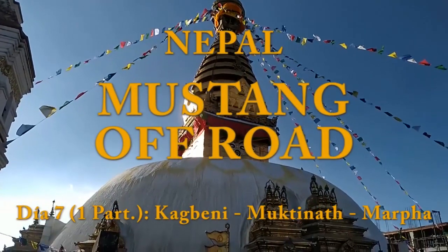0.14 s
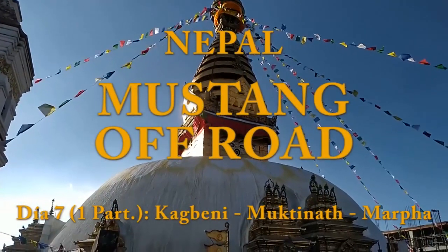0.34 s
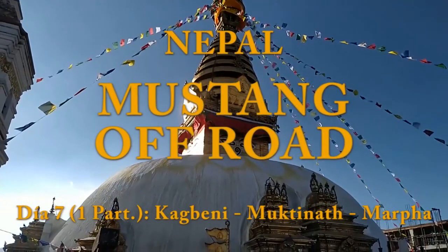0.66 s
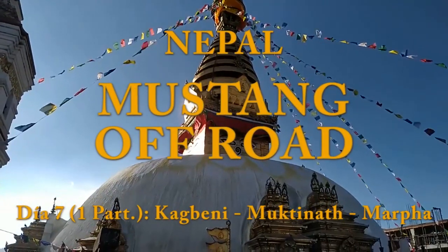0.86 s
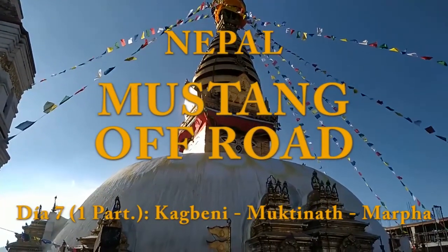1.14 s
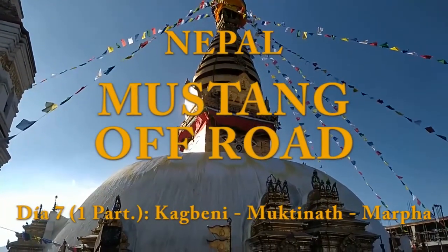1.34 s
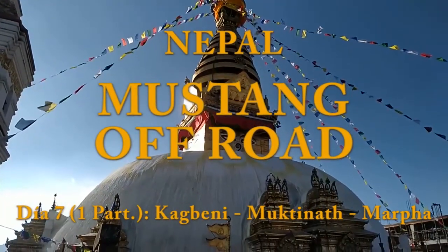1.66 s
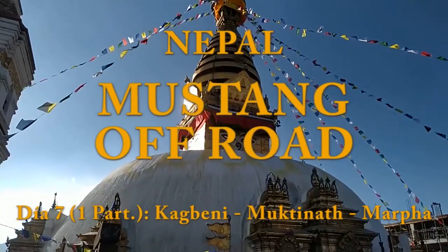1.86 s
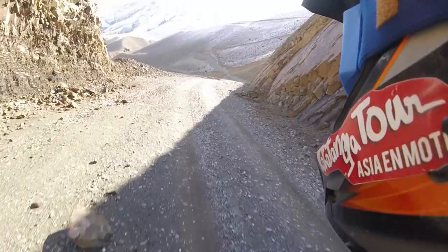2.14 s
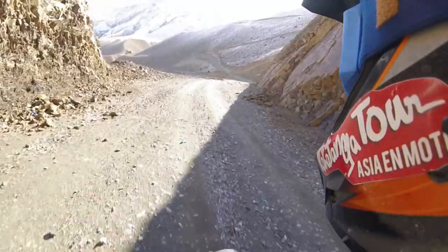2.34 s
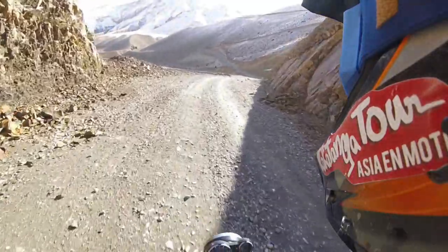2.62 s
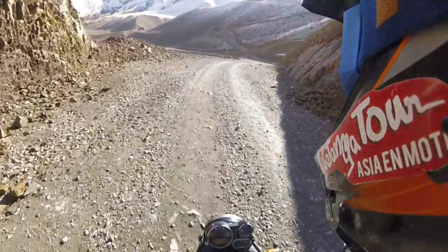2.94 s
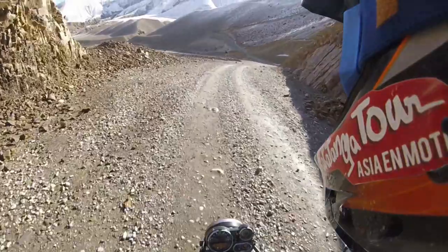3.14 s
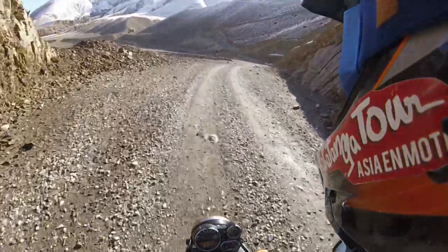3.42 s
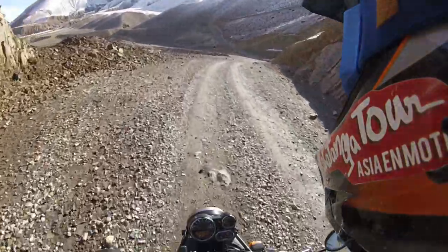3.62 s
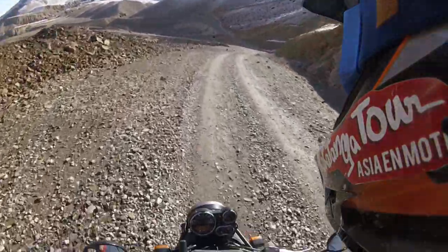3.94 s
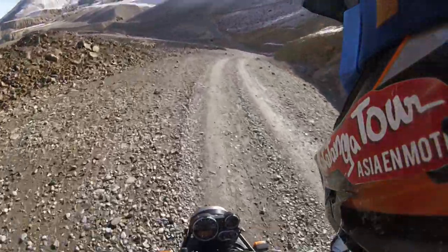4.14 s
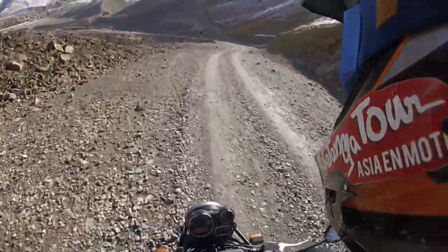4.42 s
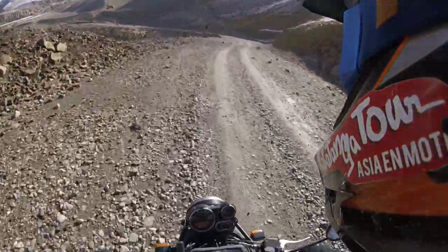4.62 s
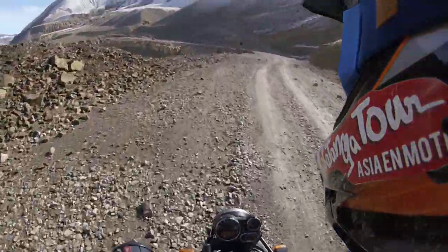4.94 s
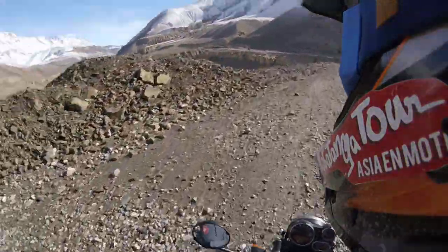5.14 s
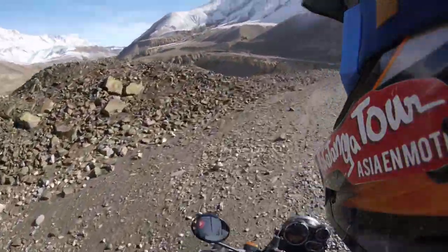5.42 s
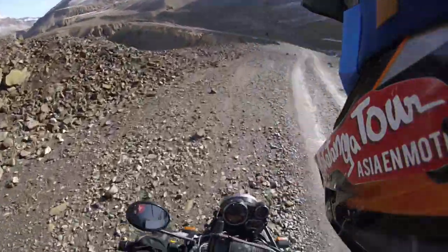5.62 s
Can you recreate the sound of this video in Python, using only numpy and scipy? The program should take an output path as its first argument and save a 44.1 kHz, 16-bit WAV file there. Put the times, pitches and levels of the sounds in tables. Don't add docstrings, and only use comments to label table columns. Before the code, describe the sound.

Wind presses on a small camera microphone inside a plastic housing, outdoors on a moving single-cylinder motorcycle. From the start, irregular low thumps and rumbling overlie a steady engine: about thirty soft exhaust thuds a second, a hollow casing knock and faint pipe ring. Valve gear ticks and hisses, coloured by the housing into a thin, high whistle, with a faint crunch of gravel. The engine rises slightly until about 2.1 s while wind thickens, and from 1 to 3.4 s strong pushes and short tearing snaps crowd together. A thin stone chip clicks near 2.7 s. The engine then slows, reaching its lowest pace around 4.8 s. Wind eases from 3.5 s, uncovering the exhaust thuds, and loose parts rattle sharply around 4.7 to 4.9 s. From about 5 s the engine speeds up again and bursts of wind return, brighter and rougher, with dense snaps until the abrupt end.

```python
import sys
import numpy as np
from scipy import signal
from scipy.fft import rfft, irfft
from scipy.io import wavfile
from scipy.ndimage import uniform_filter1d

SR = 44100
rng = np.random.default_rng(int(sys.argv[2]) if len(sys.argv) > 2 else 0)


def master_out(mix):
    frames = np.transpose(np.atleast_2d(mix))
    ceiling = np.clip(frames, -1, 1)
    pcm = np.round(ceiling * 32767).astype(np.int16)
    wavfile.write(sys.argv[1], SR, pcm)


def invert_db(x):
    u = np.asarray(x, float) / 20
    return 10 ** u


N = 254192
T = np.arange(N) / SR
HZ = np.fft.rfftfreq(N, 1 / SR)


def evened(x):
    return x / np.sqrt(np.mean(x ** 2) + 1e-20)


def curve(rows, column):
    columns = np.transpose(rows)
    return np.interp(T, columns[0], columns[column])


def colour(x, points):
    hz, db = np.transpose(points)
    gain_db = np.interp(np.log(HZ + 1), np.log(hz + 1), db, -120, -120)
    return irfft(rfft(x) * invert_db(gain_db), N)


def band(x, lo_hz, hi_hz):
    return signal.sosfiltfilt(signal.butter(2, [lo_hz, hi_hz], "band", fs=SR, output="sos"), x)


def split(x):
    below_70, below_320 = (1 / (1 + (HZ / hz) ** 4) for hz in (70, 320))
    gains = (below_70, below_320 - below_70, 1 - below_320)
    return [irfft(rfft(x) * gain, N) for gain in gains]


def resonate(x, modes):
    out = np.zeros(N)
    for k, (hz, width_hz, db) in enumerate(modes):
        r = np.exp(-np.pi * width_hz / SR)
        angle = 2 * np.pi * hz / SR
        rung = signal.lfilter([1, 0, -1], [1, -2 * r * np.cos(angle), r * r], x)
        out += (-1) ** k * invert_db(db) * (1 - r) * rung
    return out


def drift(seconds):
    size = max(int(seconds * SR), 2)
    return evened(uniform_filter1d(uniform_filter1d(rng.standard_normal(N), size), size))


def ticks(per_s, size_db, fade_s):
    sizes = invert_db(size_db * np.minimum(rng.exponential(1, N), 4))
    hits = sizes * (rng.random(N) < per_s / SR)
    return evened(signal.lfilter([1], [1, -np.exp(-1 / (fade_s * SR))], hits))


def burst(rows, t60_s):
    swell = np.zeros(N)
    for start_s, db in rows:
        part = slice(round(start_s * SR), round((start_s + .1) * SR))
        after_s = np.maximum(T[part] - start_s - .0008, 0)
        swell[part] += invert_db(db - 60 * after_s / t60_s) * np.minimum(after_s / .0007, 1)
    return swell * rng.standard_normal(N)


# time_s, firing_rate_hz
ENGINE_SPEED = [(0.0, 30.01), (0.3, 30.64), (0.9, 31.09), (1.2, 31.71), (1.5, 32.44), (1.8, 33.42),
                (2.1, 33.68), (2.4, 33.54), (2.7, 31.73), (3.3, 29.98), (3.6, 28.24), (3.9, 26.11),
                (4.2, 24.34), (4.5, 22.88), (4.8, 20.88), (5.1, 22.33), (5.4, 23.95), (5.76, 25.27)]


def firing_hz():
    return curve(ENGINE_SPEED, 1)


def once_a_cycle(place, width):
    turns = np.cumsum(firing_hz()) / SR
    return np.exp((np.cos(2 * np.pi * (turns - place)) - 1) / (2 * np.pi * width) ** 2)


# middle_s, rise_db, length_s
GUST_BUMPS = [(0.07, 6, 0.091), (0.675, 3.5, 0.025), (0.943, 1.5, 0.032), (1.4, 3, 0.015),
              (1.626, -1, 0.035), (1.927, 3.5, 0.046), (2.156, 6, 0.035), (2.54, 3, 0.047),
              (2.676, 5.5, 0.02), (3.09, 2.5, 0.053), (3.267, -1.5, 0.021), (3.315, -17, 0.01),
              (3.36, -1.5, 0.011), (3.6, -5, 0.054), (4.937, 10.5, 0.013), (5.07, 5, 0.017),
              (5.206, 8.5, 0.039), (5.352, 9, 0.04), (5.449, 12.5, 0.016), (5.514, 13, 0.023),
              (5.694, 11, 0.017)]


def gusts():
    return sum(db * np.exp(-.5 * ((T - s) / length_s) ** 2) for s, db, length_s in GUST_BUMPS)


# time_s, level_db
ENGINE_NOISE = [(0.0, -50.5), (0.11, -48.5), (0.64, -44.5), (2.07, -44), (2.44, -41.5), (2.62, -44.5),
                (3.03, -43), (3.27, -47), (3.87, -46.5), (4.11, -47.5), (4.72, -46.5), (5.21, -51),
                (5.32, -53.5), (5.58, -51), (5.76, -52.5)]


def engine_noise_db():
    return curve(ENGINE_NOISE, 1)


# pitch_hz, level_db (per Hz)
HOUSING_TONE = [(3300, -36), (4500, -25), (5000, -18.5), (5950, -14), (6250, -7), (6500, 2.5), (6950, -4),
                (7250, -5.5), (7900, -12), (9500, -16), (10500, -26), (11200, -29.5), (13000, -33.5),
                (14200, -66)]


def through_housing(x):
    return colour(x, HOUSING_TONE)


# pitch_hz, level_db (per Hz)
GRAVEL_TONE = [(900, -4), (1500, 2), (2200, -5), (3400, -8.5), (4000, -14), (4500, -20), (6000, -60)]


def on_gravel(x):
    return colour(x, GRAVEL_TONE)


def tyres():
    bed = 1.5 + 0.27 * ticks(per_s=170, size_db=7.0, fade_s=0.0048)
    open_db = engine_noise_db()
    level_db = -50.5 + 0.25 * (firing_hz() - 30)
    level_db += 0.79 * (open_db - open_db.mean())
    level_db += 0.2 * gusts()
    return invert_db(level_db) * evened(on_gravel(bed * rng.standard_normal(N)))


# start_s, peak_db
LOOSE_PARTS = [(1.5, -30), (1.715, -31), (1.7454, -32), (2.2164, -31), (2.4275, -29), (2.836, -25),
               (2.9612, -26), (3.1918, -26), (3.557, -35.5), (3.739, -27), (4.079, -34), (4.472, -29),
               (4.963, -42), (5.62, -36), (5.7235, -28), (2.9855, -28), (3.091, -37), (3.225, -27),
               (3.39, -39), (3.481, -34), (3.5106, -25), (4.2907, -25), (4.3765, -27.5), (4.444, -26),
               (4.72, -20), (4.739, -20), (4.784, -40), (4.8069, -20.5), (4.8322, -23), (4.8793, -28),
               (4.915, -26), (5.03, -28), (5.062, -30.5), (5.1326, -28), (5.229, -23), (5.3095, -23.5),
               (5.3462, -31), (5.678, -30)]
# start_s, peak_db
VALVE_TAPS = [(0.6784, -49), (0.7382, -45), (0.8679, -45), (1.1263, -45), (1.2206, -43), (1.4361, -44),
              (1.4696, -44), (1.6482, -45), (1.8652, -39), (2.3082, -50), (2.4862, -42), (2.607, -34),
              (2.7716, -39), (2.837, -39), (2.8679, -39), (2.8948, -42), (2.9577, -37), (2.9901, -39),
              (3.0919, -38), (3.1537, -40), (3.1877, -43), (3.2241, -41), (3.3578, -44), (3.3887, -39),
              (3.4905, -44), (3.5952, -52), (3.707, -45), (4.0911, -47), (4.1694, -46), (4.2946, -37),
              (4.375, -41), (4.4214, -44), (4.4443, -52), (4.4717, -47), (4.7222, -44), (4.782, -45),
              (4.8065, -51), (4.8334, -39), (4.8803, -50), (4.9217, -47), (5.0634, -43), (5.1053, -50),
              (5.2325, -51), (5.3133, -56), (5.6176, -51), (5.7234, -50)]
CHIP_S, CHIP_DB = 2.663, -42.5


def rattles():
    scale = np.std(through_housing(rng.standard_normal(N)))
    bursts = invert_db(-10.5) * burst(LOOSE_PARTS, t60_s=0.037)
    knocks = through_housing(bursts) + invert_db(-16.0) * on_gravel(bursts)
    loose = band(knocks, 300, 10000) / scale
    taps = invert_db(2) * band(burst(VALVE_TAPS, t60_s=0.057), 8200, 10240)
    chip = invert_db(13) * band(burst([(CHIP_S, CHIP_DB)], t60_s=0.015), 2600, 5200)
    return loose + taps + chip


def clatter():
    gate = .75 + .22 * once_a_cycle(place=.58, width=.13) + .3 * once_a_cycle(place=.75, width=.05)
    bed = gate * (5 + 0.075 * ticks(per_s=110, size_db=0.0, fade_s=0.00058))
    jolts_db = 0.54 * drift(0.051)
    level_db = engine_noise_db() + 1 + jolts_db
    return invert_db(level_db) * evened(through_housing(bed * rng.standard_normal(N)))


# time_s, exhaust_thud_db, casing_knock_db
ENGINE_EFFORT = [(0, -52, -49), (.6, -40, -44.5), (1.2, -26.5, -43), (1.8, -32, -42), (2.4, -44, -39),
                 (3, -54, -49), (3.6, -25.5, -44.5), (4.2, -26, -44), (4.6, -28.5, -46.5), (4.9, -32, -46),
                 (5.3, -43, -53), (5.76, -21, -38)]
# pitch_hz, width_hz, level_db
CASING_MODES = [(697, 130, 2), (777, 116, 5.5), (959, 13.6, 5.5), (1035, 50, 1), (1615, 290, -20.5)]


def casing():
    load = np.interp(firing_hz(), (25, 30), (.15, 1))
    gate = .55 + load * once_a_cycle(place=.9, width=.07) + .3 * once_a_cycle(place=.42, width=.07)
    knock = 30 * 0.27 * load * once_a_cycle(place=.9 + 0.0057 * drift(0.059), width=0.00082)
    rung = resonate(gate * rng.standard_normal(N) + knock, CASING_MODES)
    return invert_db(curve(ENGINE_EFFORT, 2)) * evened(rung)


# pitch_hz, width_hz, level_db
PIPE_MODES = [(76.6, 51, 0.014), (101.3, 67, -2)]
# pitch_hz, width_hz, level_db
SILENCER_MODES = [(289.6, 24.3, 0)]
# time_s, level_db
SILENCER_RING = [
    (0, -42),
    (.6, -39),
    (2, -36),
    (3, -37),
    (4.2, -39),
    (4.85, -39),
    (5.76, -40),
]


def exhaust():
    place = .17 + .018 * (32 - firing_hz()) + .045 * drift(.04)
    puffs = once_a_cycle(place, width=.012) * invert_db(2.6 * drift(.04))
    rough_gas = 3 * 0.36 * invert_db(2.5 * drift(0.015)) * drift(0.0012)
    gas = evened(puffs) + rough_gas
    thud = invert_db(curve(ENGINE_EFFORT, 1)) * evened(resonate(gas, PIPE_MODES))
    ring = resonate(resonate(puffs, SILENCER_MODES), [(290, 160, 0)])
    return thud + invert_db(curve(SILENCER_RING, 1)) * evened(ring)


# time_s, strength_db, slow_buffeting_db (against the strength)
WIND_STRENGTH = [(0, -36, 7), (.15, -31.5, 0.5), (.55, -30, 3.5), (.95, -25, -1.5), (1.25, -28, -9),
                 (1.65, -23.5, -4), (2.15, -23, -2), (2.65, -21.5, -9), (2.95, -20.5, -5), (3.25, -23.5, 0),
                 (3.45, -25.5, -0.5), (4.0, -34.5, 0), (4.65, -40, 6.5), (5.05, -27, 5), (5.38, -31.5, 8),
                 (5.55, -26, 5), (5.63, -33, 8), (5.76, -23, 5.5)]


def wind_db():
    return curve(WIND_STRENGTH, 1)


def spray():
    grain = -0.5 + .5 * ticks(per_s=530, size_db=2.5, fade_s=0.0038)
    level_db = wind_db() - 32 + 0.9 * gusts()
    return invert_db(level_db) * evened(band(grain * rng.standard_normal(N), 875, 2246))


def stray_snaps(count):
    when, spread, pick = rng.random((count, 3)).T
    start_s = .03 + when * (T[-1] - .06)
    level_db = np.interp(start_s, T, wind_db()) - 4 * spread
    return zip(start_s, level_db - 17.5, -25 + 6 * (pick - .5))


# start_s, peak_db, bright_part_db (against the dull part)
RIM_SNAPS = [(0.02, -23.5, -18), (0.084, -26, -26), (0.111, -31, -19), (0.813, -37, -17), (0.888, -26, -23),
             (1.1, -24, -19), (1.309, -16.5, -20), (1.381, -17, -30), (1.562, -18, -17), (1.751, -30, -19),
             (1.865, -22, -20), (1.896, -23, -22), (1.915, -19, -24), (1.938, -17, -27), (2.065, -37, -13),
             (2.229, -20, -26), (2.368, -18, -26), (2.433, -15, -22), (2.462, -24, -23), (2.491, -14, -19),
             (2.537, -25, -16), (2.586, -21.5, -10), (2.606, -22, -20), (2.656, -21, -15), (2.681, -26, -7),
             (2.737, -26, -20), (2.826, -19, -17), (2.864, -17.5, -20), (2.978, -24, -19),
             (2.991, -19, -15), (3.023, -21, -25), (3.035, -16.5, -20), (3.148, -21, -13),
             (3.227, -26, -22), (3.256, -21, -21), (3.306, -22.5, -20), (3.381, -19, -29),
             (3.443, -20.5, -31), (3.493, -22, -23), (3.619, -19, -20), (3.682, -19, -29),
             (3.726, -23, -22), (3.822, -20.5, -17), (3.854, -24.5, -26), (5.023, -23, -22),
             (5.062, -21, -11.5), (5.183, -21, -26), (5.207, -20.5, -8.5), (5.248, -18, -17),
             (5.276, -20.5, -23), (5.322, -22, -19), (5.395, -22, -28), (5.436, -17, -14),
             (5.476, -15, -21), (5.504, -16, -17), (5.573, -21, -19), (5.623, -19.5, -29),
             (5.667, -18, -21), (5.713, -19, -10), (5.742, -18, -14),
             (4.907, -32, -14), (4.927, -32, -10), (5.084, -27, -8), (5.147, -22, -25), (5.167, -17, -26),
              (5.342, -17, -15), (5.516, -13, -17), (5.528, -16, -14), (5.646, -26, -13),
              (5.692, -17.5, -20), (5.721, -24.5, -14)]


def snaps():
    out, room = np.zeros(N), np.ones(N)
    rows = [(s + 0.00188, db - 2, bright_db) for s, db, bright_db in RIM_SNAPS]
    rows += stray_snaps(count=6)
    chances = rng.uniform(-1.36, 1, (len(rows), 4))
    for (s, db, bright_db), (dull_bend, bright_bend, dull_phase, bright_phase) in zip(rows, chances):
        near = slice(max(round((s - .012) * SR), 0), round((s + .012) * SR))
        u = T[near] - s
        length_s = 0.0013 * np.where(u < 0, .7, 1.2)
        swell = np.exp(-2 * (u / length_s) ** 2)
        dull_hz = 740 * (1 + .15 * dull_bend)
        bright_hz = 1900 * (1 + .15 * bright_bend)
        dull = np.cos(2 * np.pi * dull_hz * u + dull_phase)
        bright = np.cos(2 * np.pi * bright_hz * u + bright_phase)
        out[near] += invert_db(db) * swell * (dull + invert_db(bright_db) * bright * swell)
        room[near] *= 1 - .8 * swell ** .2
    return band(out, 250, 3600), room


# middle_s, peak_db, width_ms
WIND_PUSHES = [(0.0412, -11.3, 1.3), (0.0623, -12.7, 1.8), (0.0843, -13.1, 1.5), (0.644, -12.4, 1.9),
               (0.9011, -11.5, 1.0), (0.9219, -5.7, 1.2), (1.046, -11.5, 3.3), (1.1032, -11.3, 0.9),
               (1.3806, -10.3, 2.1), (1.3915, -11.1, 1.6), (1.4149, -11.6, 1.5), (1.6178, -8.1, 1.9),
               (1.6371, -10.8, 1.2), (1.7226, -8.8, 1.6), (1.8166, -7.2, 1.7), (1.8978, -5.3, 1.7),
               (1.9074, -8.2, 1.1), (1.9789, -10.0, 1.0), (2.0878, -9.0, 1.4), (2.1322, -10.2, 1.6),
               (2.1417, -8.1, 1.4), (2.176, -7.3, 1.4), (2.201, -10.2, 1.5), (2.2285, -9.8, 1.3),
               (2.278, -8.4, 1.4), (2.3691, -9.1, 1.0), (2.4011, -8.5, 1.1), (2.4334, -9.0, 1.1),
               (2.455, -10.1, 1.6), (2.4929, -10.0, 1.5), (2.6575, -6.5, 1.4), (2.6841, -8.9, 2.3),
               (2.6975, -6.6, 0.9), (2.743, -10.0, 1.6), (2.7834, -8.3, 1.2), (2.8172, -7.6, 1.2),
               (2.8272, -8.3, 2.4), (2.8563, -9.7, 1.5), (2.8903, -8.8, 1.8), (2.98, -8.5, 1.3),
               (2.9917, -8.4, 0.8), (3.0044, -7.4, 1.5), (3.0526, -8.2, 1.3), (3.0986, -9.5, 0.8),
               (3.115, -8.8, 1.2), (3.1291, -5.7, 1.5), (3.2574, -5.8, 1.9), (3.3056, -5.0, 1.4),
               (3.3843, -9.7, 1.8), (3.62, -8.5, 1.6), (3.8042, -11.8, 3.0), (5.0268, -5.2, 1.7),
               (5.0568, -8.9, 1.9), (5.3531, -7.4, 1.6), (5.3655, -9.8, 1.7), (5.4488, -9.5, 0.7),
               (5.4789, -9.6, 2.5), (5.5023, -10.0, 1.4), (5.6962, -6.0, 2.4), (5.7141, -6.3, 1.4),
               (0.0241, -14.3, 1.4), (0.3916, -13.9, 1.0), (0.6944, -13.8, 1.7), (0.8043, -13.4, 1.4),
                 (0.9362, -13.4, 1.5), (0.9667, -13.2, 2.2), (0.996, -12.3, 0.8), (1.0569, -12.7, 1.3),
                 (1.2356, -13.2, 1.7), (1.3178, -13.2, 1.0), (1.5213, -12.3, 0.9), (1.6021, -13.0, 1.5),
                 (1.8374, -12.0, 1.5), (1.8677, -10.5, 0.9), (1.9409, -10.6, 1.9), (1.9555, -11.6, 1.8),
                 (2.0211, -12.0, 2.2), (2.1077, -11.8, 1.1), (2.1578, -10.8, 1.5), (2.294, -11.7, 1.1),
                 (2.3473, -12.0, 1.7), (2.5064, -11.9, 1.3), (2.5168, -11.7, 1.1), (2.555, -12.0, 1.7),
                 (2.5766, -12.1, 1.4), (2.588, -10.3, 1.1), (2.61, -10.3, 0.9), (2.6467, -11.0, 0.9),
                 (2.7954, -11.7, 0.9), (2.9144, -11.1, 2.0), (2.9454, -10.6, 1.6), (3.0231, -9.9, 1.1),
                 (3.037, -11.6, 0.8), (3.078, -11.2, 1.7), (3.1578, -9.9, 2.2), (3.2104, -11.7, 3.0),
                 (3.229, -10.4, 1.6), (3.27, -10.4, 1.3), (3.5129, -12.9, 2.0), (3.684, -12.6, 0.7),
                 (3.7515, -12.3, 1.4), (3.8795, -13.9, 2.7), (4.0705, -14.8, 2.8), (4.206, -13.4, 2.0),
                 (4.2482, -14.3, 2.2), (4.693, -16.1, 2.1), (4.9366, -12.8, 2.5), (5.0696, -12.3, 2.4),
                 (5.1471, -10.8, 1.3), (5.185, -11.2, 1.9), (5.2117, -11.8, 1.1), (5.2536, -11.1, 1.4),
                 (5.2855, -11.0, 2.3), (5.4024, -11.8, 1.0), (5.5197, -12.1, 2.6), (5.5329, -10.7, 1.4),
                 (5.5703, -10.1, 3.5), (5.5832, -9.9, 1.8), (5.6813, -11.5, 1.9), (5.7429, -12.4, 2.3)]


def pushes():
    out, room = np.zeros(N), np.ones(N)
    for s, db, width_ms in WIND_PUSHES:
        near = slice(max(round((s - .02) * SR), 0), round((s + .02) * SR))
        u = (T[near] - s) / (width_ms / 1000)
        rise = np.exp(-np.sqrt((1.5 * u) ** 2 + .06) - .3 * u ** 2)
        dip = np.exp(-.5 * (u / 3) ** 2)
        shape = rise - dip * rise.sum() / dip.sum()
        out[near] += invert_db(db + 1.4) * shape / shape.max()
        room[near] *= 1 - .85 * np.exp(-.5 * (u / 2.2) ** 2)
    return out, room


# pitch_hz, level_db (per Hz)
EDDY_TONE = [(7.1, -24), (12, -14.5), (43, -11), (143, 1.5), (224, -3), (260, -6), (350, -11), (471, -16.5),
             (736, -23.5), (1340, -37), (2090, -66.5), (2420, -74), (4500, -65), (5850, -54), (9900, -120)]


def wind():
    sizes = invert_db(3.2 * np.minimum(rng.exponential(1, N), 3)) * (rng.random(N) < 300 / SR)
    air = 0.57 * evened(sizes - sizes.mean()) + 0.85 * rng.standard_normal(N)
    lumps = invert_db(0.3 * drift(0.031))
    steady = []
    for part in split(colour(air * lumps, EDDY_TONE)):
        power = uniform_filter1d(part ** 2, SR // 18)
        steady.append(part / np.sqrt(power + 1e-9 * np.mean(part ** 2)))
    strength, rise = wind_db(), gusts()
    buffet_db = strength - 2 + curve(WIND_STRENGTH, 2) + 0.16 * rise + 3.5 * drift(0.03)
    body_db = strength - 1.5 + 0.61 * rise
    flutter_db = strength.mean() + 0.98 * (strength - strength.mean()) - 7.5 + rise
    clumps_db = 1.37 * drift(0.014)
    return [invert_db(db + clumps_db) * part for db, part in zip((buffet_db, body_db, flutter_db), steady)]


def scene():
    buffet, body, flutter = wind()
    strong, room = pushes()
    tears, gaps = snaps()
    flutter = flutter * gaps * invert_db(.8 * drift(.008))
    air = buffet + room * (body + flutter) + band(strong, 15, 850) + tears
    return (air + exhaust() + casing() + clatter() + tyres() + rattles() + spray())[None]


# pitch_hz, share (0-1)
EMPTY_SHARE = [(3700, .03), (4000, .25), (4400, .42), (4750, .3), (5100, .05), (5700, 0), (9800, 0),
               (10300, .35), (10900, .72), (11600, .68), (12600, .55), (13100, .65), (13600, .95)]


def holes(x):
    hz, t, z = signal.stft(x, SR, nperseg=2048, noverlap=1536)
    treble = hz[:, None] > 10000
    narrow = np.repeat(rng.standard_normal((257, len(t))), 4, axis=0)[:len(hz)]
    wide = np.repeat(rng.standard_normal((22, len(t))), 48, axis=0)[:len(hz)] * treble
    chance = uniform_filter1d(narrow + .6 * wide, size=10, axis=1)
    chance /= chance.std(axis=1, keepdims=True)
    level_db = np.interp(t, T, engine_noise_db())
    chance += .06 * (level_db - level_db.mean()) * treble
    chance += 3 * (abs(t - CHIP_S) < .02) * (hz[:, None] < 6000)
    share_hz, share = np.transpose(EMPTY_SHARE)
    edge = np.quantile(chance, np.interp(hz, share_hz, share, 0, 1))
    kept = z * np.where(chance < edge[:, None], .003, 1)
    return signal.istft(kept, SR, nperseg=2048, noverlap=1536)[1][:, :N]


def top_cut(x):
    return signal.sosfilt(signal.butter(12, 13975, fs=SR, output="sos"), x)


def record(dry):
    squeezed = .8 * np.tanh(dry / .8)
    finished = holes(squeezed)
    return top_cut(finished)


dry = scene()
out = record(dry)
master_out(out)
```